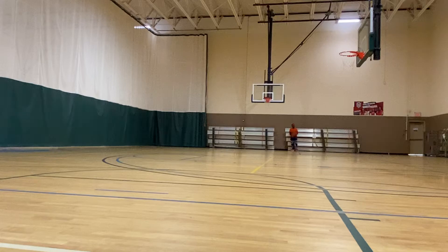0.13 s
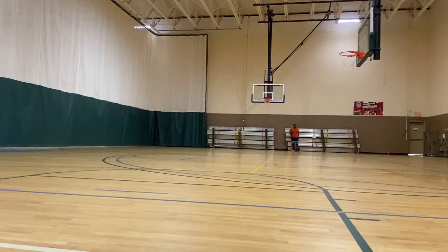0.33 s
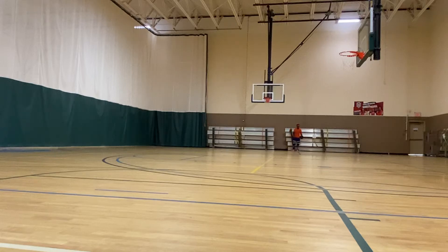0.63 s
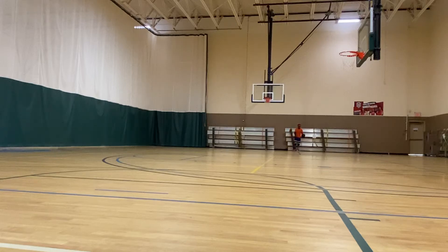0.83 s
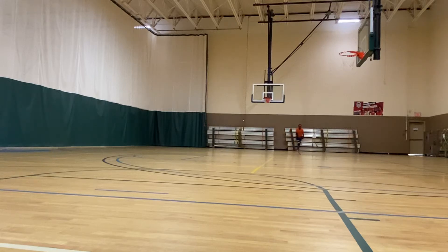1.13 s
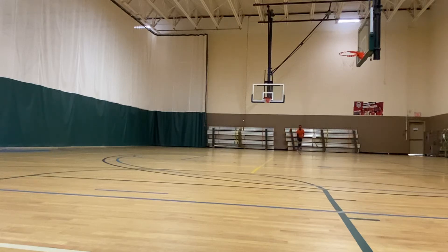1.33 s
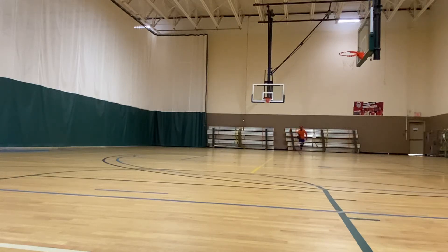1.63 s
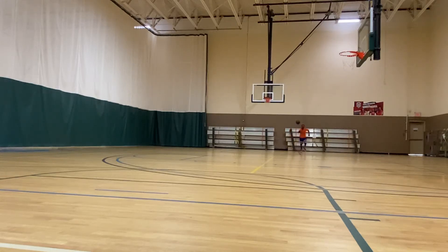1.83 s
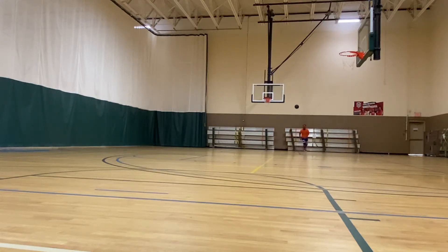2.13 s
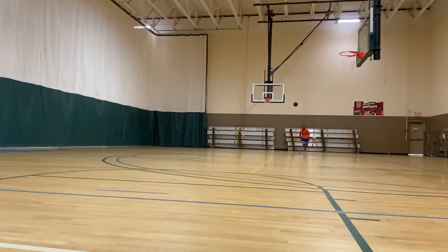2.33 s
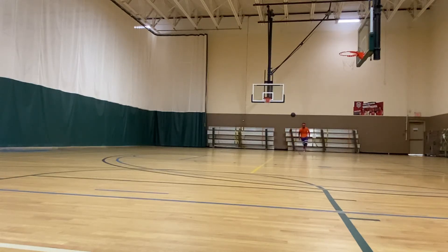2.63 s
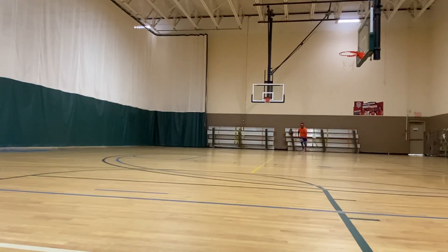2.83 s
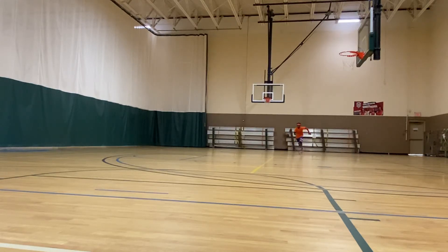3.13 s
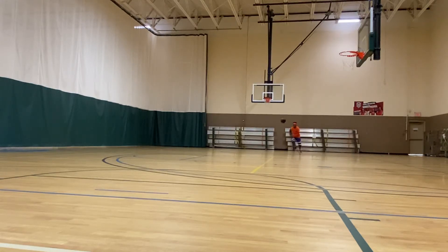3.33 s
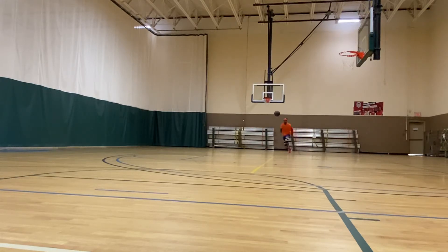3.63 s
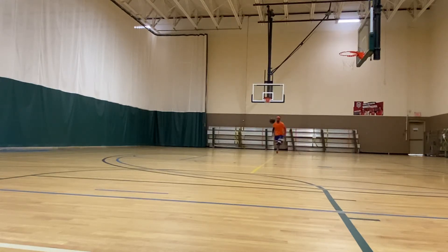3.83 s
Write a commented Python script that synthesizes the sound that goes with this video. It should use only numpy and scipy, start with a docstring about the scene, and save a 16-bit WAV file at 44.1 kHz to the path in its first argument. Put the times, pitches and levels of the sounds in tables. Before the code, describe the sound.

Basketball bounces heard from across a large, reverberant gym: a duller first hit, a long ringing gap, then two louder hits about a second apart, with faint footsteps and scuffs over steady low ventilation rumble.

```python
"""After a blink of silence, the dying ring of an earlier bounce over the rumble of ventilation, in a large gym.
A basketball then bounces three times on the wooden floor: struck modes give a slap and a hollow thump,
delayed copies the wall echoes, and shaped noise the long tail. Shoes tap (struck modes), scuff and squeak
(swelling noise) faintly; ventilation is noise with a slight level drift.
A stereo pair of microphones listens from across the court and opens a moment late."""
import sys
import numpy as np
from scipy import signal
from scipy.fft import rfft, irfft, next_fast_len
from scipy.io import wavfile
from scipy.ndimage import uniform_filter1d, map_coordinates

SR = 44100
rng = np.random.default_rng(int(sys.argv[2]) if len(sys.argv) > 2 else 0)


def master_out(mix):
    """Clip the mix to full scale and print it as 16-bit PCM to the path in sys.argv[1]."""
    frames = np.transpose(np.atleast_2d(mix))
    ceiling = np.clip(frames, -1, 1)
    pcm = np.round(ceiling * 32767).astype(np.int16)
    wavfile.write(sys.argv[1], SR, pcm)


N = 176400

# Ball bounces: t/s, slap level/dB (before SLAP_TRIM_DB), thump level/dB, tail level/dB, tail boom/dB,
# tail treble/dB, ping f/Hz, ping lift in the tail/dB, echo delay stretch/ratio
BOUNCES = [(0.169, -13.5, -20.5, -28, -2, 14, 1600, 3.5, .84),
           (2.7963, -5.5, -12.5, -20.5, -2.5, 5, 1170, 4, 0.97),
           (3.9496, -5, -15.5, -19, -8, 4, 1380, 5.5, 1.0)]
# A bounce before the start, still ringing: t/s, tail level/dB
EARLIER_BOUNCE = (-0.42, -36)
# Modes of the ball's skin: f/Hz, level/dB, t60/s
SKIN_MODES = [(780, -9, .012), (1900, 1, .003), (2900, -3, .003), (4200, -8, .003), (6300, -11, .003),
              (10500, -30, .003)]
# Modes of the floor boards: f/Hz, level/dB, t60/s
BOARD_MODES = [(87, -5, 0.062), (121.7, -0.5, 0.13), (202, 1, 0.049), (356, -12.5, 0.021)]
# Walls, roof and bleachers: delay t/s, slap level/dB (before clustering), thump level/dB, left lag/ms
ECHOES = [(.0025, -10, -23.5, 0.4), (0.014, -9.5, -3, 0.042), (.021, -7.5, -17.5, -.1),
          (0.026, -5, -5.5, -0.16), (.040, -4.5, -6.5, 0.1), (.048, -11.5, -15, -0.11),
          (.066, -11.5, -19, -0.14), (0.094, -12.5, -5.5, 0.24), (0.187, -16, -12, -0.093),
          (.265, -22, -11.5, 0.15)]
# Colour of the ball's tail: f/Hz, relative level/dB per Hz
TAIL_SPECTRUM = [(18, -35), (35, -22.5), (60, -4.5), (91, 3.5), (150, -5.5), (270, -16.5), (400, -20.5),
                 (640, -28.5), (1000, -27.5), (1900, -29.5), (2700, -37.5), (3800, -43.5), (6200, -49),
                 (8000, -57), (10200, -82), (12500, -67.5), (16000, -110)]
# Decay of the gym: f/Hz, t60/s
GYM_DECAY = [(40, 2.8), (90, 2.74), (200, 2.74), (500, 2.94), (1200, 2.49), (2500, 2.61), (3600, 2.3),
             (5000, 1.51), (7500, 0.93), (12000, 0.95)]
# Footsteps: t/s, tap level/dB (before TAP_TRIM_DB), tail level/dB
STEPS = [(1.7534, -36.5, -57.5), (2.4288, -43.5, -73.5), (2.7412, -34.5, -55), (3.604, -33.5, -49.5)]
# Modes of a shoe on the boards: f/Hz, level/dB, t60/s
SOLE_MODES = [(260.9, -4, 0.042), (699, 3, 0.007), (1010, 7, 0.0053), (1440, -1, 0.0057)]
# Colour of a footstep's tail: f/Hz, relative level/dB per Hz
STEP_TAIL_SPECTRUM = [(60, -24), (200, -7), (900, 0.5), (2000, -8.5), (4000, -28), (8000, -44)]
# Shoe scuffs: centre t/s, swell width/s, level/dB
SCUFFS = [(1.84, .05, -63), (3.665, .065, -70)]
# Colour of the scuffs: f/Hz, relative level/dB per Hz
SCUFF_SPECTRUM = [(800, -14), (2000, 0), (4000, -9), (6500, -14), (8200, -19), (9500, -40)]
# Shoe squeaks: centre t/s, swell width/s, pitch f/Hz, level/dB
SQUEAKS = [(2.04, .07, 5900, -82), (3.865, .07, 6050, -78)]
# Colour of the ventilation: f/Hz, relative level/dB per Hz
AIR_SPECTRUM = [(12, -53), (20, -10.5), (79, 0), (103, -8.5), (208, -15), (258, -18), (321, -18),
                (467, -20.5), (507, -21.5), (801, -26.5), (1270, -28.5), (3160, -50), (12500, -72.5),
                (16200, -84), (22000, -120)]
# Left-right likeness of sound from all sides: f/Hz, correlation/-1 to 1
LIKENESS = [(60, 0.94), (130, 0.79), (270, 0.58), (580, -0.43), (1250, -0.29), (2660, 0.23), (5680, -0.13),
            (12100, 1)]
# Resonance of the left microphone port: centre f/Hz, width/Hz, level/dB
LEFT_PORT = (2020, 2600, 3.22)

SLAP_TRIM_DB, SLAP_RISE_S = -4, .00015
PING_DB, PING_T60_S = -2, .009  # one skin mode is pitched by how the ball lands
THUMP_DELAY_S, THUMP_RISE_S = 0.00482, 0.0033
LEFT_LAG_MS = .14  # of the direct sound
SCATTER_S, DULL_HZ = .007, 7000  # longest echo cluster; walls soak up the treble
CLUSTER_TRIM_DB, CLUSTER_SPREAD_DB, CLUSTER_SPREAD_MS = -6, 3, .15
BUILD_S, BOOM_BUILD_S = .014, 0.044  # build-up of the whole tail, and of its boom
BOOM_HZ, TREBLE_HZ, RING_OCTAVES, PATCHY_DB = 260, 3520, 0.43, 2.24
TAP_TRIM_DB, TAP_RISE_S = -3, 0.00054
SCUFF_FADE_S = .1  # lingering of scuffs and squeaks
SQUEAK_WIDTH_HZ = 1400
AIR_DB, AIR_DRIFT_DB, AIR_DRIFT_HZ = -46, 0.27, 6
LEFT_DB = 0.78
START_S, START_RISE_S, TOP_HZ = .0715, .002, 12750


def ball():
    """Each bounce excites skin, boards and gym; an earlier one is still dying away."""
    earlier_s, earlier_db = EARLIER_BOUNCE
    out = amp(earlier_db) * tail(earlier_s, TAIL_SPECTRUM)
    for s, slap_db, thump_db, tail_db, boom_db, treble_db, ping_hz, ping_db, stretch in BOUNCES:
        out += thump(s, thump_db, stretch)
        out += slap(s, slap_db, ping_hz, stretch)
        out += amp(tail_db) * tail(s, TAIL_SPECTRUM, boom_db, treble_db, ping_hz, ping_db)
    return out


def slap(s, level_db, ping_hz, stretch):
    """The skin's short modes and its ping, struck with inverted polarity and echoed by the gym."""
    modes = SKIN_MODES + [(ping_hz, PING_DB, PING_T60_S)]
    return -echoed(amp(level_db + SLAP_TRIM_DB) * ring(s, modes, SLAP_RISE_S), stretch)


def thump(s, level_db, stretch):
    """The boards' low modes speak just after the slap, with one plain echo per surface."""
    blow = amp(level_db) * ring(s + THUMP_DELAY_S, BOARD_MODES, THUMP_RISE_S)
    direct = [(0.00012, 0.027, LEFT_LAG_MS)]
    return arrive(blow, direct + [(delay * stretch, db, lag) for delay, _, db, lag in ECHOES])


def ring(start_s, modes, rise_s):
    """One blow on an object: decaying sines, each mode's level varied by about 1 dB."""
    t = np.maximum(np.arange(N) / SR - start_s, 0)
    x = 0
    for hz, db, t60 in modes:
        x = x + amp(db + rng.standard_normal() - 60 * t / t60) * np.sin(2 * np.pi * hz * t)
    return x * (1 - np.exp(-t / rise_s))


def echoed(x, stretch, count=4):
    """A sharp sound straight across the court, then in dulled clusters off each surface."""
    paths = []
    for s, db, _, lag in ECHOES:
        scatter = SCATTER_S * min(s / .02, 1)  # the earliest echoes are tighter
        lateness = np.r_[0, rng.random(count - 1)]
        for late, vary in zip(lateness, rng.standard_normal(count)):
            paths.append((s * stretch + scatter * late,
                          db + CLUSTER_TRIM_DB + CLUSTER_SPREAD_DB * vary,
                          lag + CLUSTER_SPREAD_MS * vary))
    direct = arrive(x, [(0, 0.036, LEFT_LAG_MS)])
    dulled = filtered(x, lambda hz: 1 / (1 + 1j * hz / DULL_HZ))
    return direct + arrive(dulled, paths)


def arrive(x, paths):
    """Sum delayed copies at both ports over (delay/s, level/dB, left lag/ms) paths."""
    s, db, lag_ms = np.transpose(paths)
    taps = []
    for delay in (s + lag_ms / 1000, s):
        samples = np.round(np.maximum(delay, 0) * SR).astype(int)
        taps.append(np.bincount(samples, amp(db), SR // 2))
    return signal.fftconvolve(x[None], taps, axes=1)[:, :N]


def tail(start_s, spectrum, boom_db=0, treble_db=0, ring_hz=1000, ring_db=0):
    """The gym's answer: noise builds up, then each frequency dies at its own speed, a little unevenly."""
    hz, t, z = signal.stft(diffuse(spectrum), SR, nperseg=256)
    hz = hz[:, None] + 20  # keeps clear of 0 Hz
    since = np.maximum(t - start_s, 0)
    boom = boom_db / (1 + (hz / BOOM_HZ) ** 4)
    treble = treble_db / (1 + (TREBLE_HZ / hz) ** 4)
    ping = ring_db * np.exp(-(np.log2(hz / ring_hz) / RING_OCTAVES) ** 2)
    # smoothed random patches over frequency and time
    patches = uniform_filter1d(rng.standard_normal(z.shape[1:]), size=3, axis=0)
    patches = unit(uniform_filter1d(patches, size=4, axis=1))
    uneven_db = PATCHY_DB * patches * (hz > BOOM_HZ)
    decay_db = -60 * since / np.maximum(along(GYM_DECAY, hz), .1)
    z = z * amp(decay_db + boom + treble + ping + uneven_db)
    # the lows swell up more slowly
    z = z * np.where(hz < BOOM_HZ, 1 - np.exp(-(since / BOOM_BUILD_S) ** 2), 1)
    age = np.maximum(np.arange(N) / SR - start_s, 0)
    return signal.istft(z, SR, nperseg=256)[1][:, :N] * (1 - np.exp(-(age / BUILD_S) ** 2))


def shoes():
    """The player's shoes on the boards: taps, scuffs and squeaks."""
    return footsteps() + scuffs() + squeaks()


def footsteps():
    """Soft taps: sole modes struck once, echoed, each with a tail."""
    out = 0
    for s, db, tail_db in STEPS:
        out = out + echoed(amp(db + TAP_TRIM_DB) * ring(s, SOLE_MODES, TAP_RISE_S), 1)
        out = out + amp(tail_db) * tail(s, STEP_TAIL_SPECTRUM)
    return out


def scuffs():
    """Rubbing soles: broad noise that swells and lingers."""
    return diffuse(SCUFF_SPECTRUM) * sum(amp(db) * swell(s, width) for s, width, db in SCUFFS)


def squeaks():
    """Thin squeaks: noise peaked around a pitch, swelling and lingering."""
    out = 0
    for s, width, hz, db in SQUEAKS:
        band = [(hz - SQUEAK_WIDTH_HZ, -30), (hz, 0), (hz + SQUEAK_WIDTH_HZ, -30), (hz + 1500, -90)]
        out = out + amp(db) * swell(s, width) * diffuse(band)
    return out


def swell(s, width_s):
    """Loudness that rises like a bell curve, then lingers in the room."""
    t = np.arange(N) / SR - s
    bell = np.exp(-(t / width_s) ** 2)
    linger = .4 * np.exp(-np.abs(t) / SCUFF_FADE_S)
    return np.where(t < 0, bell, np.maximum(bell, linger))


def ventilation():
    """Rumble and hush from all sides: shaped noise, breathing slightly in level."""
    drift = map_coordinates(rng.standard_normal(40), [np.arange(N) * AIR_DRIFT_HZ / SR])
    return amp(AIR_DB + AIR_DRIFT_DB * drift) * diffuse(AIR_SPECTRUM)


def diffuse(spectrum):
    """Stereo noise of rms 1 from all sides: the mid-side balance sets the left-right likeness."""
    def response(hz):
        turn = np.arccos(np.clip(along(LIKENESS, hz), -1, 1)) / 2
        return amp(along(spectrum, hz)) * [np.cos(turn), np.sin(turn)]

    mid, side = filtered(rng.standard_normal((2, N)), response)
    return unit(np.array([mid + side, mid - side]))


def filtered(x, response):
    """Shape x in the spectrum by a complex response of frequency."""
    m = next_fast_len(x.shape[-1] + SR // 2)
    return irfft(rfft(x, m) * response(np.fft.rfftfreq(m, 1 / SR)), m)[..., :x.shape[-1]]


def along(points, hz):
    """Read a curve of (f/Hz, value) points on a log frequency axis."""
    f, v = np.transpose(points)
    return np.interp(np.log(hz + 1), np.log(f + 1), v)


def amp(db):
    """Decibels to linear gain."""
    return 10 ** (np.asarray(db) / 20)


def unit(x):
    """Scale to rms 1."""
    return x / np.sqrt(np.mean(x ** 2) + 1e-20)


def scene():
    """Ball in front, shoes behind it, ventilation underneath."""
    return ball() + shoes() + ventilation()


def record(dry):
    """Microphones: a louder, resonant left port, a late opening and a sharp treble limit."""
    centre, width, peak_db = LEFT_PORT

    def left_port(hz):
        damping = 1j * hz * width
        resonance = damping / (centre * centre - hz * hz + damping)
        return amp(LEFT_DB) * (1 + (amp(peak_db) - 1) * resonance)

    ports = np.array([filtered(dry[0], left_port), dry[1]])
    opening = np.clip((np.arange(N) / SR - START_S) / START_RISE_S, 0, 1)
    return filtered(ports * opening, lambda hz: hz < TOP_HZ)


dry = scene()
out = record(dry)
master_out(out)
```